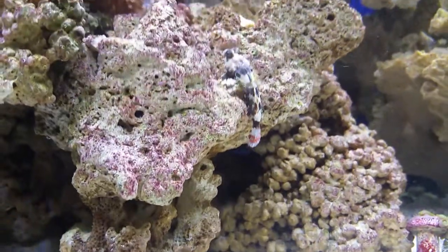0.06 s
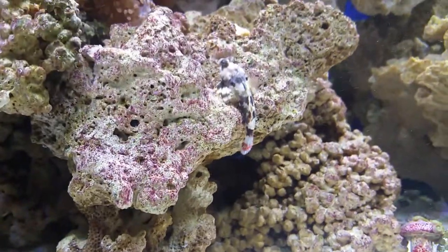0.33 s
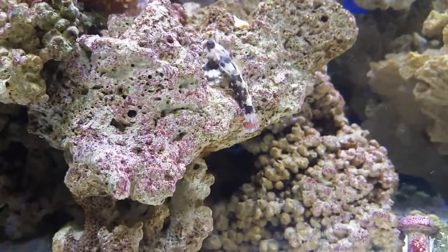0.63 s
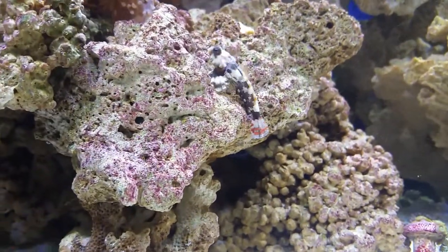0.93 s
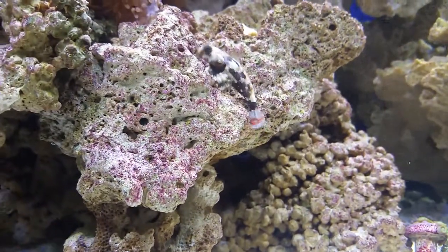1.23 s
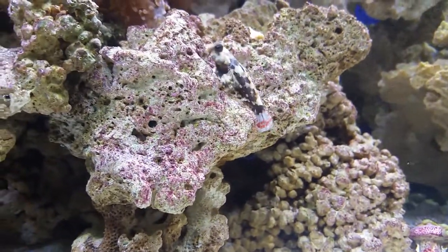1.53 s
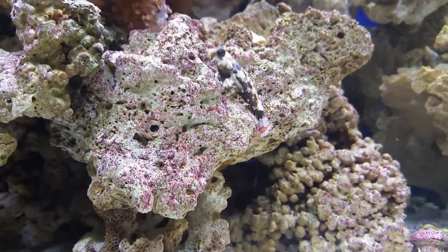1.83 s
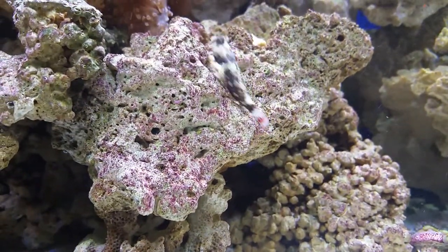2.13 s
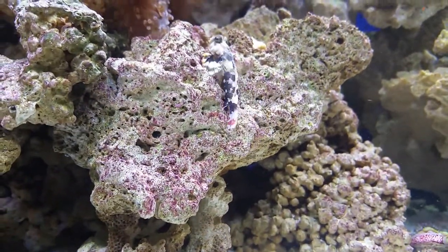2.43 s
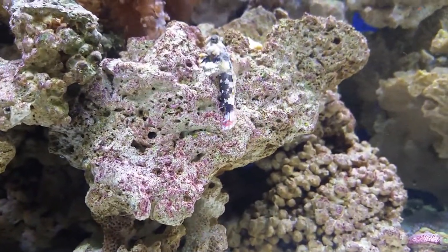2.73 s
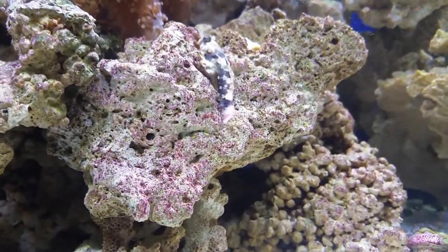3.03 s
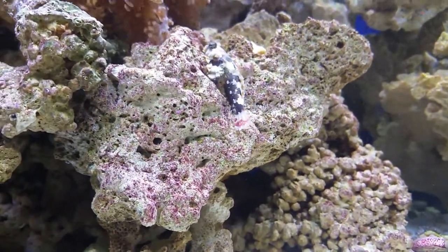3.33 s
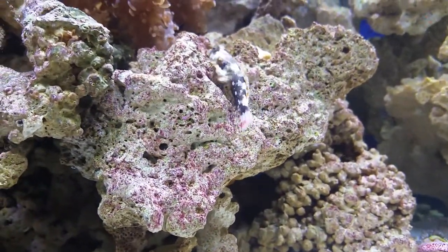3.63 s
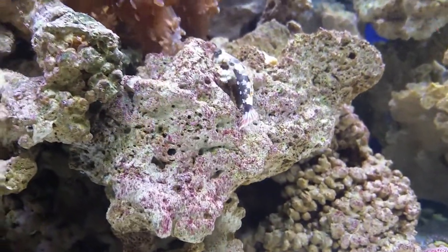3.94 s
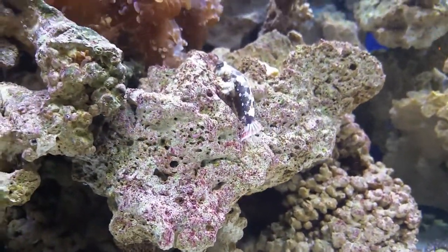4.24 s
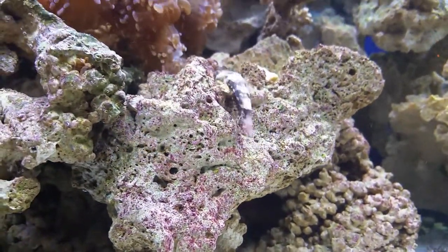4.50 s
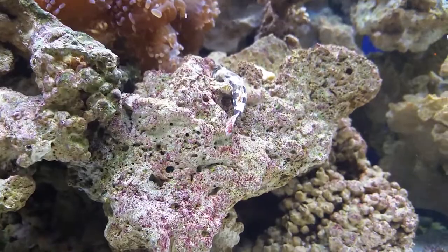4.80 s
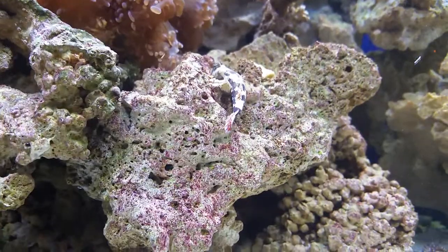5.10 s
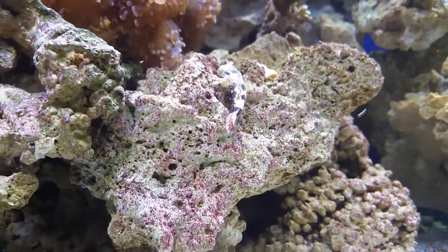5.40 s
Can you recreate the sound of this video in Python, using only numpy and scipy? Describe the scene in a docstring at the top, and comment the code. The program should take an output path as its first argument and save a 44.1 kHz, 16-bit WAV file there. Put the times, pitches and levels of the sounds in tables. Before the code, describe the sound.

An indoor fish tank hums and rumbles low while draining water bubbles continuously and tiny droplets tick and fizz.

```python
"""Water gurgles steadily down the overflow of an indoor reef aquarium, gulping air in a hollow cabinet.
Each air bubble rings at its own pitch; at the surface, foam fizzes and fine droplets burst.
Underneath, circulation pumps hum, locked to the mains, and the flow makes the tank rumble.
Once a thin, very high squeak glides by."""
import sys
import numpy as np
from scipy import signal
from scipy.fft import rfft, irfft
from scipy.io import wavfile

SR = 44100
rng = np.random.default_rng(int(sys.argv[2]) if len(sys.argv) > 2 else 0)


def int16_out(signal):
    """Quantize to a 16-bit WAV file."""
    q = np.round(np.clip(np.atleast_2d(signal).T, -1, 1) * 32767)
    wavfile.write(sys.argv[1], SR, q.astype(np.int16))


N = 249606
TIME = np.arange(N) / SR


def from_db(db):
    """Decibels to gain."""
    return 10 ** (np.asarray(db) / 20)


def unit_rms(x):
    """Scale to unit power."""
    return x / np.sqrt(np.mean(x ** 2) + 1e-20)


def at_samples(rows):
    """Each column of a time curve, at every sample."""
    times_s, *columns = np.transpose(rows)
    return [np.interp(TIME, times_s, column) for column in columns]


def at_bins(rows):
    """A curve over log frequency, at every FFT bin."""
    hz, value = np.transpose(rows)
    bin_hz = np.arange(N // 2 + 1) * SR / N
    return np.interp(np.log(bin_hz + 1), np.log(hz), value)


def colour(x, spectrum):
    """Filter by a gain curve in dB."""
    return irfft(rfft(x) * from_db(at_bins(spectrum)), N)


def pan(balance_db):
    """Stereo gains for a left-minus-right level."""
    return from_db(np.array([[.5], [-.5]]) * balance_db)


def drift(rate_hz):
    """Slow low-passed noise, unit RMS."""
    hop, settle = 40, 2000
    pole = np.exp(-2 * np.pi * rate_hz * hop / SR)
    noise = rng.standard_normal(N // hop + settle + 2)
    slow = signal.lfilter([1], [1, -2 * pole, pole ** 2], noise)[settle:]
    return np.interp(np.arange(N) / hop, np.arange(len(slow)), unit_rms(slow))


def resonate(x, hz, width_hz):
    """Two-pole resonance, unit peak gain."""
    radius = np.exp(-np.pi * width_hz / SR)
    forward = np.array([1, 0, -1]) * (1 - radius ** 2) / 2
    feedback = [1, -2 * radius * np.cos(2 * np.pi * hz / SR), radius ** 2]
    return signal.lfilter(forward, feedback, x + 1e-18)


def add(out, start_s, sound):
    """Mix a sound in at a time."""
    start = int(np.clip(round(start_s * SR), 0, N - 1))
    out[start:start + len(sound)] += sound[:N - start]


def reflections(x, t60_s, tail_db, tail_t60_s=.25):
    """Two unrelated channels of dense glass reflections with a room tail."""
    t = TIME[:SR // 4]
    fade = from_db(-60 * t / t60_s) + from_db(tail_db - 60 * t / tail_t60_s)
    response = rng.standard_normal((2, len(t))) * fade / np.linalg.norm(fade)
    return signal.fftconvolve(x[None], response, axes=1)


def decay(energy, t60_s):
    """Spread energy impulses into exponential tails."""
    pole = from_db(-120 / (t60_s * SR))
    return signal.lfilter([1 - pole], [1, -pole], energy + 1e-18)


def bubble_cloud(per_s, range_hz, bands, q, spread_db, clump_db, t60_s, tail_db):
    """Small cavities ring at random, like sizes in clumps, smeared by glass and room reflections."""
    out = np.zeros((2, N))
    noise = rng.standard_normal((4, 2, N))
    for k, hz in enumerate(np.geomspace(*range_hz, bands)):
        births = rng.random(N) < per_s / SR / bands
        strength_db = spread_db * np.minimum(rng.exponential(1, N), 4) + clump_db * drift(10)
        energy = births * from_db(strength_db) ** 2
        envelope = np.sqrt(decay(energy, t60_s) + from_db(tail_db) ** 2 * decay(energy, t60_s=.35))
        out += np.sqrt(hz) * unit_rms(resonate(envelope * noise[k % len(noise)], hz, hz / q))
    return unit_rms(out)


# Left-right likeness: (frequency [Hz], correlation [-1..1])
CORRELATION = [(200, .995), (290, .96), (400, .8), (750, .74), (1000, .42), (1300, .4), (1600, -.3),
               (2200, .1), (4000, 0)]


def to_stereo(mid_side):
    """Mid and side to left and right; long waves reach both sides alike."""
    mid, side = rfft(mid_side)
    alike = at_bins(CORRELATION)
    return irfft(np.sqrt((1 + alike) / 2) * mid + np.sqrt((1 - alike) / 2) * side * [[1], [-1]], N)


# Pump hum: (mains multiple, RMS level [dB], left minus right [dB])
HUM_HARMONICS = [(2, -36.3, 0.2), (3, -36.1, -0.2), (4, -62, -3), (5, -50.5, 4.5), (8, -75, 12.5),
                 (9, -63, 12), (11, -68.5, 1)]


def pumps(mains_hz=60, waver_db=1, left_lead_s=.00014):
    """The motors vibrate at multiples of the mains frequency."""
    t = TIME + np.array([[left_lead_s], [0]])
    out = np.zeros((2, N))
    for multiple, db, balance_db in HUM_HARMONICS:
        tone = np.sqrt(2) * np.sin(2 * np.pi * multiple * mains_hz * t)
        out += from_db(db + waver_db * drift(6.5)) * pan(balance_db) * tone
    return out


# Tank and stand, return-pipe churn, brighter swirl: (frequency [Hz], gain [dB])
TANK_SPECTRUM = [(8, -28), (22, -18), (35, -16), (47, -4), (58, -4.5), (66, -9), (78, -5), (92, -6.5),
                 (115, 0), (140, -2), (160, -3), (180, 1.5), (200, -6), (300, -14), (600, -32), (2000, -70)]
CHURN_SPECTRUM = [(120, -12), (205, -20.5), (235, 16), (255, 8), (290, 6), (310, 1.5), (330, -4.5),
                  (380, -17.5), (450, -8), (600, -54), (2000, -78)]
SWIRL_SPECTRUM = [(180, -16), (260, -2), (345, -2.5), (420, -21), (700, -33)]
# Return-pipe surges: (centre [s], length [s], churn rise [dB])
PIPE_SURGES = [(0.308, 0.47, 2.5), (2, 0.28, 5), (2.51, 0.42, 3.5), (3.456, 0.39, 3.5), (5.292, 0.19, 8)]


def rumble(tank_db=-43.5, churn_db=-43.5, swirl_db=-57):
    """Turbulence shakes panes and stand; the return pipe swells and brightens with each surge."""
    surge_db = sum(rise_db * np.cos(np.pi * np.clip((TIME - centre_s) / length_s, -.5, .5)) ** 2
                   for centre_s, length_s, rise_db in PIPE_SURGES)
    out = np.zeros((2, N))
    for spectrum, db in [(TANK_SPECTRUM, tank_db), (CHURN_SPECTRUM, churn_db + surge_db),
                         (SWIRL_SPECTRUM, swirl_db + 1.8 * surge_db)]:
        turbulence = to_stereo(rng.standard_normal((2, N)))
        out += from_db(db) * unit_rms(colour(turbulence, spectrum))
    return out


# Squeak strands: (time [s], pitch [Hz], relative level [dB])
LOW_STRAND = [(1.39, 9950, -68), (1.45, 10250, -56), (1.51, 10480, -59), (1.55, 10750, -58),
              (1.64, 10550, -58), (1.69, 11050, -59), (1.74, 10480, -58), (1.78, 9700, -67)]
MIDDLE_STRAND = [(1.46, 10750, -66), (1.53, 11400, -61), (1.61, 11300, -63), (1.65, 11550, -60),
                 (1.685, 12000, -56), (1.725, 11700, -55.5), (1.745, 11450, -72)]
HIGH_STRAND = [(1.51, 14400, -70), (1.56, 14250, -55), (1.62, 14300, -58), (1.66, 14150, -66),
               (1.7, 14350, -61), (1.73, 14200, -72)]


def squeak(gain_db=-4.5, flutter_db=1.5, balance_db=-8):
    """A thin, unsteady whistle on the right: two nearly pure strands under a breathy one."""
    out = np.zeros(N)
    for strand, jitter in [(LOW_STRAND, .003), (MIDDLE_STRAND, .003), (HIGH_STRAND, .011)]:
        hz, db = at_samples(strand)
        gate = (TIME > strand[0][0]) & (TIME < strand[-1][0])
        tone = np.sin(2 * np.pi * np.cumsum(hz * (1 + jitter * drift(210))) / SR)
        out += gate * from_db(db + gain_db + flutter_db * drift(40)) * tone
    return pan(balance_db) * out


# Finest fizz: (frequency [Hz], gain [dB])
MIST_SPECTRUM = [(5000, -12), (8500, -5), (10400, 17.5), (11500, 16), (12600, 18.5), (14500, 15)]


def mist(level_db):
    """The tiniest bubbles crackle in the top treble."""
    fizz = bubble_cloud(per_s=650, range_hz=(9000, 14000), bands=5, q=4,
                        spread_db=3, clump_db=1.5, t60_s=.022, tail_db=3)
    return from_db(level_db) * unit_rms(colour(fizz, MIST_SPECTRUM))


# Loudest droplets: (time [s], relative level [dB], pitch [Hz])
LOUD_DROPLETS = [(0.07, -42, 7720), (0.186, -41, 4400), (0.2957, -36, 8000), (0.402, -41, 7900),
                 (0.512, -43, 4400), (0.578, -43, 4600), (0.614, -40.5, 4400), (0.7123, -46, 8470),
                 (0.808, -33, 7500), (0.818, -38, 4700), (0.9712, -40, 7930), (1.061, -40, 7870),
                 (1.2388, -29.5, 7800), (1.24, -41, 4500), (1.35, -41, 4500), (1.55, -42, 4500),
                 (1.8426, -41, 3560), (1.9435, -41, 7960), (2.075, -41, 7800), (2.354, -38, 8240),
                 (2.613, -38, 4660), (2.7417, -40, 7600), (2.796, -37, 8230), (2.925, -41, 4400),
                 (3.025, -39, 7830), (3.167, -37, 5900), (3.1667, -37.5, 8000), (3.215, -43, 4500),
                 (3.225, -42, 7900), (3.275, -42, 7900), (3.3079, -41, 7860), (3.366, -41, 4700),
                 (3.4013, -36.5, 7400), (3.6296, -39, 7600), (3.7643, -36, 7300), (3.796, -34, 6200),
                 (3.8655, -36.5, 8690), (3.905, -40, 2800), (3.9654, -39, 8400), (3.985, -37.5, 3100),
                 (4.028, -41, 4200), (4.115, -37.5, 3700), (4.213, -35.5, 4210), (4.2817, -39.5, 4990),
                 (4.283, -40, 8500), (4.582, -41.5, 5660), (4.61, -40, 4200), (4.702, -38.5, 8120),
                 (4.8174, -40, 7310), (4.89, -38, 7600), (4.903, -39.5, 4400), (5.025, -36.5, 8560),
                 (5.058, -37, 3200), (5.1068, -37, 8850), (5.159, -38, 4990), (5.212, -41, 8000),
                 (5.418, -39.5, 4630), (5.6204, -36.5, 5600)]


def droplets(gain_db=-5, t60_s=.095, q=7, swell_cycles=11, faint_per_s=16, faint_db=-48):
    """Droplets burst with a bright tick as their cavities ring; faint ones patter in between."""
    low_hz, high_hz = 4400, 9500
    draws = rng.random((int(faint_per_s * N / SR), 2))
    faint = [((k + lag) / faint_per_s, faint_db, low_hz * (high_hz / low_hz) ** height)
             for k, (lag, height) in enumerate(draws)]
    out = np.zeros((2, N))
    t = TIME[:SR // 8]
    for start_s, db, hz in LOUD_DROPLETS + faint:
        ring = unit_rms(resonate(rng.standard_normal((2, len(t))), hz, hz / q))
        envelope = np.minimum(t * hz / swell_cycles, 1) * from_db(db + gain_db - 60 * t / t60_s)
        for channel, tick in zip(out, ring * envelope):
            add(channel, start_s, tick)
    return out


# Spray per side: (frequency [Hz], gain [dB])
SPRAY_LEFT_SPECTRUM = [(1800, -16), (3000, -1.5), (4000, -4), (5200, -7.5), (6300, -10), (7300, -1),
                       (7900, 2.5), (8700, -2.5), (9600, -5.5), (13000, -13)]
SPRAY_RIGHT_SPECTRUM = [(1800, 9), (3000, -1.5), (4400, 0.5), (6200, -2), (6900, -4.5), (8000, -4.5),
                        (8700, -4), (9500, -6.5), (13000, -21)]


def spray(fizz_db, hiss_db=-8):
    """Small bubbles fizz over a soft hiss, dotted with bursting droplets."""
    def colour_sides(pair):
        return np.array([colour(pair[0], SPRAY_LEFT_SPECTRUM), colour(pair[1], SPRAY_RIGHT_SPECTRUM)])

    fizz = bubble_cloud(per_s=700, range_hz=(2760, 9970), bands=12, q=5.5,
                        spread_db=1.6, clump_db=1.2, t60_s=.035, tail_db=-1)
    fizz += from_db(hiss_db) * rng.standard_normal((2, N))
    return from_db(fizz_db) * unit_rms(colour_sides(fizz)) + colour_sides(droplets())


def panes(pair, echoes=5, echo_db=-16):
    """Early echoes off the glass ripple the treble, differently on each side."""
    out = pair.copy()
    for channel, direct in zip(out, pair):
        for delay_s in rng.uniform(.001, .012, echoes):
            add(channel, delay_s, from_db(echo_db) * direct)
    return out


# Foam bursting at the surface: (time [s], relative level [dB])
FOAM_LEVEL = [(0.0, -57), (0.6, -57), (0.78, -61.5), (1.2, -57.5), (1.42, -56), (1.6, -53.5), (1.83, -55),
              (2.0, -60), (2.29, -63), (2.45, -58.5), (2.74, -56), (2.95, -60.5), (3.75, -57.5),
              (4.29, -54.5), (4.6, -60.5), (4.82, -60.5), (4.96, -57.5), (5.5, -58), (5.66, -56)]


def surface(gain_db=-2.5, spray_db=-50.02, spray_follow=.57, sputter_depth_db=.35):
    """Foam bursts unevenly; the mist follows it fully, the coarser fizz in part."""
    foam_db, = at_samples(FOAM_LEVEL)
    sputter_db = sputter_depth_db * drift(7)
    fizz_db = spray_db + spray_follow * (foam_db - np.mean(foam_db))
    return from_db(gain_db) * panes(spray(fizz_db + sputter_db) + mist(foam_db + sputter_db))


# Large bubbles: (time [s], length [s], start pitch [Hz], end pitch [Hz], relative level [dB])
GLUG_CHIRPS = [(1.071, .026, 690, 880, -46), (1.107, .036, 720, 1010, -44), (1.147, .032, 840, 1020, -43.5),
               (1.239, .054, 1240, 1640, -38.5), (5.394, .02, 1740, 2100, -39.5)]


def glugs(echo_db=-6):
    """Large bubbles chirp upwards as they rise, quickly at first; returns mid and side."""
    direct = np.zeros(N)
    for start_s, length_s, start_hz, end_hz, db in GLUG_CHIRPS:
        progress = np.linspace(0, 1, int(length_s * SR))
        hz = start_hz + (end_hz - start_hz) * np.sin(np.pi / 2 * progress)
        envelope = from_db(db) * np.sqrt(np.abs(np.sin(np.pi * progress)))
        add(direct, start_s, envelope * np.sin(2 * np.pi * np.cumsum(hz) / SR))
    mid_side = from_db(echo_db) * reflections(direct, t60_s=.07, tail_db=-12)[:, :N]
    mid_side[0] += direct
    return mid_side


def bubble(hz, t60_s=.042, rise=.026, swell_cycles=2.5):
    """A bubble pinches off softly, rings and rises in pitch as it nears the surface."""
    t = TIME[:SR // 10]
    pitch_hz = hz * (1 + rise * (np.minimum(t / t60_s, 1) - .25))
    swell = np.sin(np.pi / 2 * np.minimum(t * hz / swell_cycles, 1)) ** 2
    return swell * np.sin(2 * np.pi * np.cumsum(pitch_hz) / SR) * from_db(-60 * t / t60_s)


# Loudest air gulps: (time [s], pitch [Hz], relative level [dB], pitch spread [fraction])
LOUD_GULPS = [(0.175, 1430, -44, 0.024), (0.278, 796, -39.5, 0.036), (0.44, 1360, -42, 0.026),
              (0.5, 2000, -40.5, .12), (0.615, 742, -38.5, 0.15), (0.615, 1497, -40, 0.13),
              (0.748, 2170, -38, .015), (1.178, 1630, -39, 0.084), (1.185, 1350, -42, 0.039),
              (1.211, 2790, -43, 0.032), (1.212, 1600, -49, .02), (1.246, 1573, -38, 0.12),
              (1.38, 988, -47, .03), (1.513, 2035, -42, .18), (1.564, 2044, -37.5, 0.12),
              (1.595, 2150, -39.5, .14), (1.6, 1393, -41.5, 0.08), (1.651, 730, -41, 0.036),
              (1.697, 1366, -39, .03), (2.0, 1325, -50, .02), (2.133, 1980, -40, 0.13),
              (2.15, 950, -39.5, 0.09), (2.173, 853, -35.5, 0.12), (2.201, 795, -36.5, 0.096),
              (2.295, 1385, -39, .06), (2.505, 486, -41, .04), (2.562, 1083, -36.5, 0.078),
              (2.695, 1244, -41, 0.065), (2.864, 2400, -38.5, 0.13), (3.02, 1950, -42, .08),
              (3.189, 1910, -39, 0.12), (3.215, 1975, -38, 0.079), (3.262, 672, -42, 0.16),
              (3.405, 1880, -43, 0.055), (3.42, 1430, -41, .03), (3.434, 832, -39, 0.07),
              (3.538, 1410, -37, 0.022), (3.827, 970, -35.5, 0.046), (3.829, 772, -37.5, .04),
              (4.024, 1960, -35.5, 0.048), (4.028, 2540, -39, 0.17), (4.104, 1340, -34.5, 0.026),
              (4.107, 2086, -39.5, 0.16), (4.128, 1290, -50, .02), (4.168, 710, -35, 0.055),
              (4.188, 690, -44, 0.023), (4.273, 727, -38, 0.05), (4.288, 2054, -38, 0.12),
              (4.383, 953, -39.5, 0.037), (4.463, 792, -34.5, 0.025), (4.495, 2140, -41, .1),
              (4.59, 1470, -49, 0.071), (4.688, 2220, -37.5, 0.15), (4.688, 754, -40, 0.12),
              (4.712, 1306, -40, 0.02), (4.739, 1300, -43, .02), (4.829, 1063, -41, 0.12),
              (5.058, 2125, -43.5, 0.075), (5.205, 2240, -41.5, 0.059), (5.252, 1330, -43, .03),
              (5.303, 1290, -39, 0.067), (5.394, 1830, -35, 0.073), (5.398, 1385, -41, 0.087),
              (5.405, 2400, -43, 0.036), (5.52, 1267, -40, 0.073)]


def gulps(bubbles=5, gap_cycles=2.2, faint_per_s=4, faint_db=-61, faint_spread=.18):
    """Each air pocket breaks into a quick run of like-sized bubbles; returns mid and side."""
    low_hz, high_hz = 644, 2530
    draws = rng.random((int(faint_per_s * N / SR), 2))
    faint = [(when * N / SR, low_hz * (high_hz / low_hz) ** height, faint_db, faint_spread)
             for when, height in draws]
    out = np.zeros((2, N))
    for start_s, hz, db, spread in LOUD_GULPS + faint:
        cluster = np.zeros(N)
        for k, detune in enumerate(rng.permutation(np.linspace(-1, 1, bubbles))):
            add(cluster, k * gap_cycles / hz, bubble(hz * np.exp(spread * detune)))
        direct = cluster[:SR // 10]
        mid_side = reflections(direct, t60_s=.08, tail_db=-10)
        add(mid_side[0], 0, direct)
        for channel, gulp in zip(out, mid_side):
            add(channel, start_s, from_db(db) * unit_rms(gulp))
    return out


# Cabinet resonances: (frequency [Hz], width [Hz], left gain [dB], right gain [dB])
CABINET_MODES = [(478, 16, -2, -12), (540, 22, -2, -5), (674, 14, 0, -5), (745, 50, -3, -12),
                 (795, 40, -14, -4), (856, 16, 0, 4), (984, 14, 0, 8), (1152, 22, -3, 0), (1282, 14, 5, 5),
                 (1335, 20, -2, 1), (1407, 18, -7, 5), (1432, 18, 2, -12), (1467, 16, -12, 3),
                 (1572, 28, 2, 5), (1668, 34, -8, 2), (1765, 22, -11, -4), (1905, 18, -6, -6),
                 (1970, 24, -5, -4), (2035, 60, -1, -1.5), (2208, 13, 3, 4), (2340, 50, -10, -10),
                 (2420, 50, -9, -9), (2497, 22, -1, -10)]


def cabinet(pair, direct_db=-2):
    """The hollow stand rings at its own pitches, differently towards each side."""
    ringing = sum(from_db([[left_db], [right_db]]) * resonate(pair, hz, width_hz)
                  for hz, width_hz, left_db, right_db in CABINET_MODES)
    return from_db(direct_db) * pair + ringing


# Steady gurgle: (time [s], relative level [dB])
GURGLE_LEVEL = [(0.0, -40), (0.48, -41.5), (0.68, -38.5), (1.0, -40.5), (1.23, -39.5), (2.0, -39.5),
                (2.55, -38.5), (3.05, -40), (3.4, -40), (4.5, -38.5), (4.9, -42), (5.25, -39), (5.66, -41)]
# Steady gurgle: (frequency [Hz], gain [dB])
GURGLE_SPECTRUM = [(100, -26), (380, -3.5), (500, 2), (620, 0.5), (780, 0), (1100, -1), (1400, -1.5),
                   (1800, -2.5), (2150, -1.5), (2600, -6), (3300, -11.5), (4500, -33), (10000, -49)]
# Overflow position: (frequency [Hz], left minus right [dB])
OVERFLOW_BALANCE = [(330, 3), (600, 1), (850, -2.2), (1400, -2.5), (1800, -4), (2100, -2.2), (3000, -3.5)]


def overflow(gurgle_gain_db=-4, rush_db=-10, gulp_gain_db=-18.5):
    """Draining water traps air: small bubbles over a soft rush, gulps and glugs, all in the cabinet."""
    gurgle_db, = at_samples(GURGLE_LEVEL)
    water = bubble_cloud(per_s=950, range_hz=(341.8, 4055), bands=22, q=7.8,
                         spread_db=1.9, clump_db=1.6, t60_s=.032, tail_db=3)
    water += from_db(rush_db) * rng.standard_normal((2, N))
    gurgle = unit_rms(cabinet(to_stereo(colour(water, GURGLE_SPECTRUM))))
    large_bubbles = cabinet(to_stereo(from_db(gulp_gain_db) * gulps() + glugs()))
    mix = from_db(gurgle_db + gurgle_gain_db) * gurgle + large_bubbles
    return irfft(rfft(mix) * pan(at_bins(OVERFLOW_BALANCE)), N)


def scene():
    """Hum and rumble below, a squeak and moving water above."""
    return pumps() + rumble() + squeak() + surface() + overflow()


def record(dry):
    """Steep low-pass."""
    cutoff_hz = 14550
    return signal.sosfilt(signal.ellip(12, .1, 90, cutoff_hz, fs=SR, output="sos"), dry)


dry = scene()
out = record(dry)
int16_out(out)
```